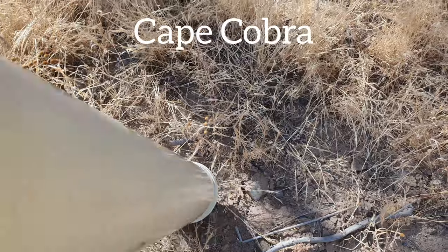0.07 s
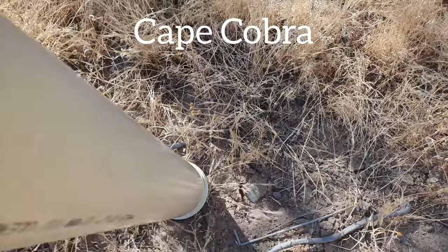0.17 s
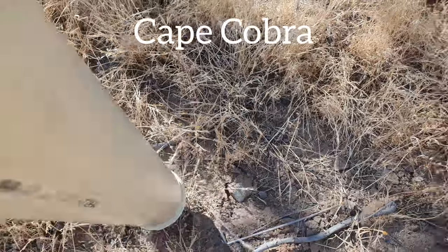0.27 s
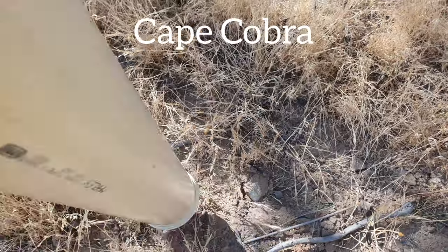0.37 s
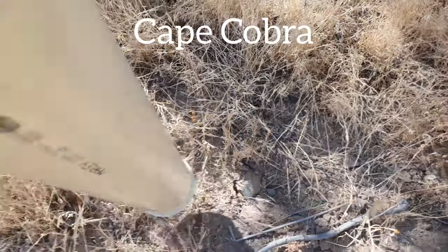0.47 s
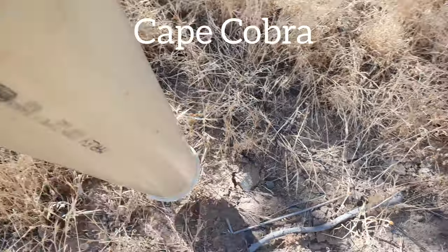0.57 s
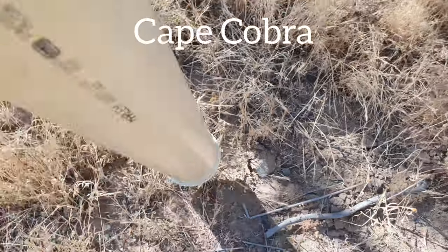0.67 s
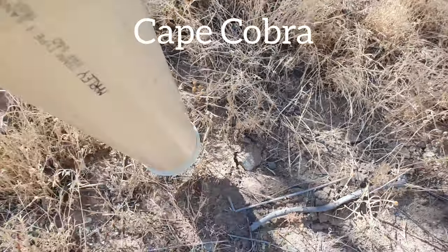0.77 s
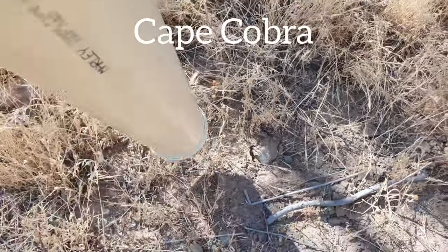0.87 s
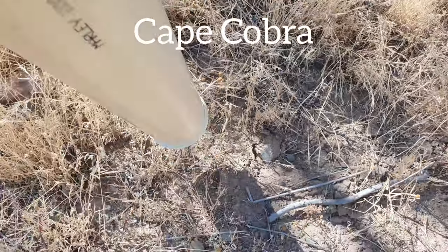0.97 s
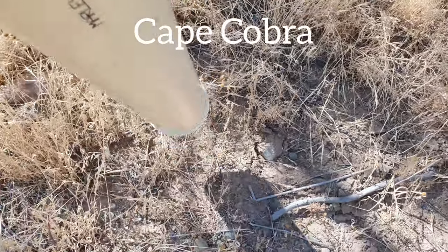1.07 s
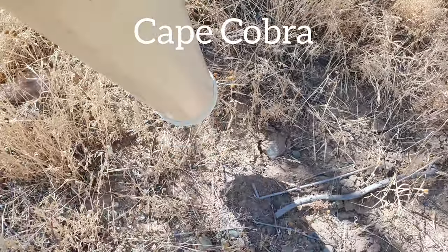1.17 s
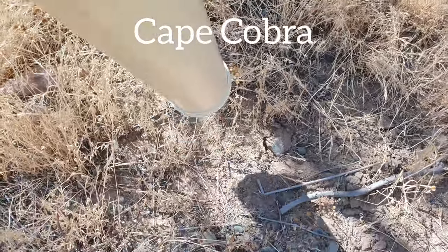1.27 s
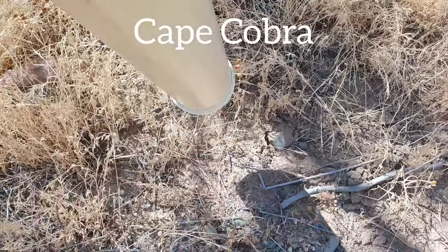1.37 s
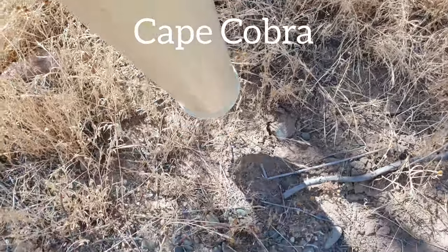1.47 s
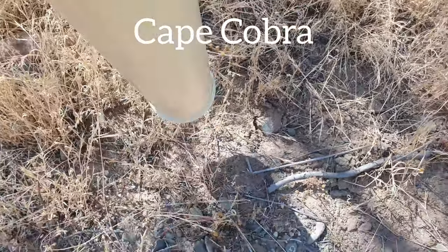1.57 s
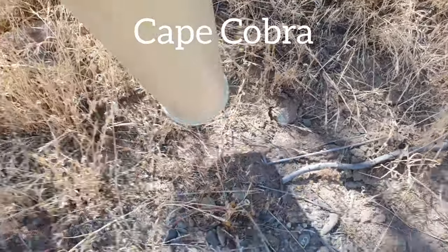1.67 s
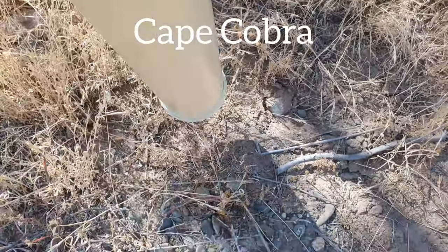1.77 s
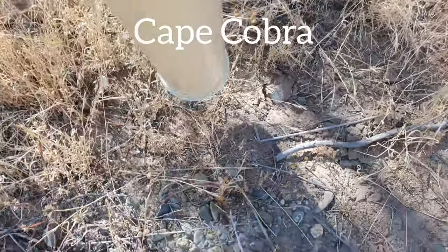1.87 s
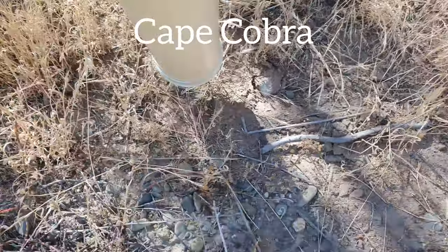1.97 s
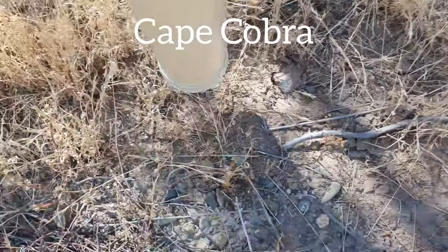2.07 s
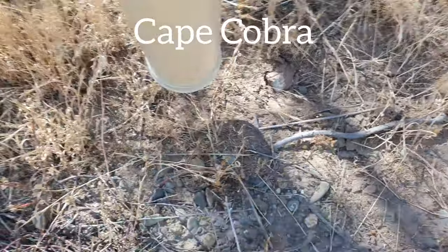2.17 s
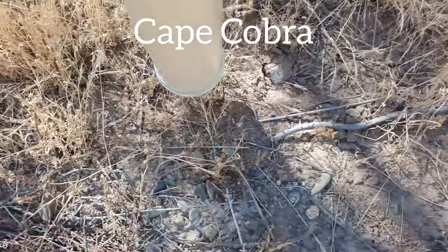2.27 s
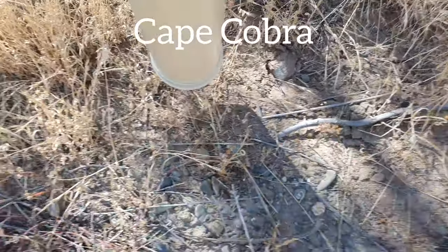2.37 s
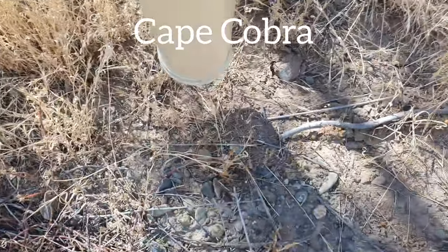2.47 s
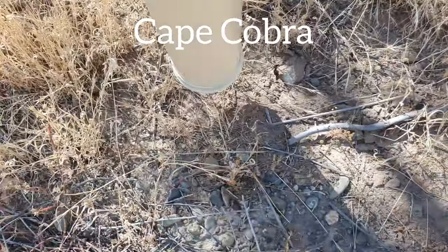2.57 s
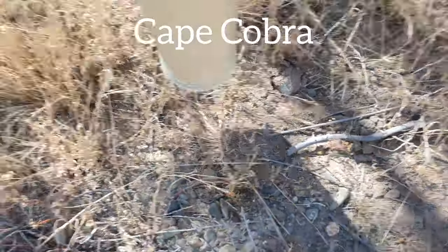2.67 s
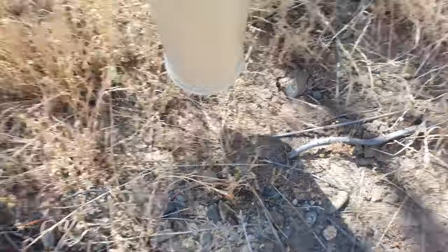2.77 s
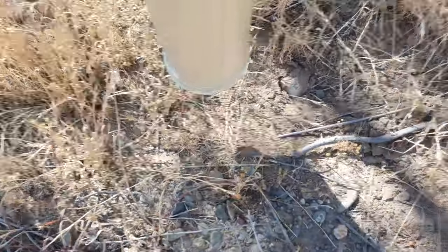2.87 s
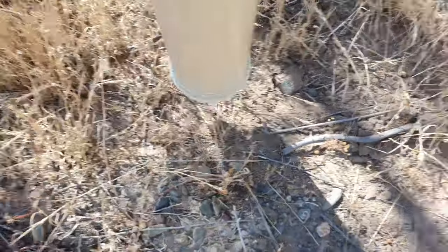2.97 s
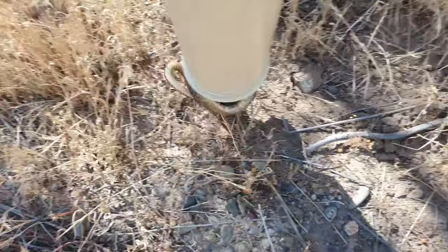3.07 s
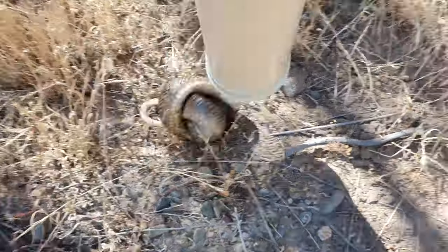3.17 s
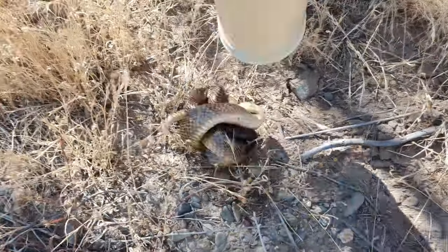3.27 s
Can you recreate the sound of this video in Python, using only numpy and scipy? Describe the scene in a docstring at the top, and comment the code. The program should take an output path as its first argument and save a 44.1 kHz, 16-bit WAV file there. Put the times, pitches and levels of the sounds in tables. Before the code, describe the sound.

Snake sliding in a shaken plastic pipe, rhythmic scaly scrapes, wind thumps, and a soft landing

```python
"""Low wind rumble, a faint rustle of dry grass and a distant cicada run throughout, made from noise and clicks.
Over them a snake slides to and fro in a plastic pipe shaken over the grass: each slide is a smooth scrape of
scales, made of grainy noise, and the heavier ones also ring the pipe through resonances. Stalks snap as short cracks
and wind thumps the two microphones separately. Near the end the snake drops out: a soft low bump and a ringing pipe."""
import sys
import numpy as np
from scipy import signal
from scipy.fft import rfft, irfft
from scipy.io import wavfile
from scipy.ndimage import uniform_filter1d, map_coordinates

SR = 44100
rng = np.random.default_rng(int(sys.argv[2]) if len(sys.argv) > 2 else 0)


def store_pcm(level_fs):
    """Save levels as 16-bit WAV."""
    pcm = np.round(np.clip(level_fs, -1, 1) * 32767).astype(np.int16)
    wavfile.write(sys.argv[1], SR, np.atleast_2d(pcm).T)


N = 147735  # length in samples

# Wind thumps at one microphone: centre_s, level_db, pitch_hz, length_ms (before BUFFET_SPREAD), side (0 left, 1 right)
BUFFETS = [(0.172, -15.5, 93.4, 13, 0), (0.171, -20, 101, 14.4, 1), (0.222, -19.5, 116, 7.8, 0),
           (0.338, -22.5, 83, 16, 1), (0.361, -8, 109, 2.86, 0), (0.414, -5, 83, 7.7, 0),
           (0.451, -18, 82, 28, 0),(0.486, -8.5, 130, 3.35, 0), (0.537, -18.5, 66, 74, 0),
           (0.572, -11.5, 73.4, 7.9, 0), (0.632, -18, 66.5, 31, 0), (0.698, -14.5, 90.3, 16, 0),
           (1.099, -18.5, 60, 12.5, 0), (1.209, -19.5, 87, 30, 0), (1.246, -16.5, 86, 5.6, 0),
           (1.272, -14.5, 84, 15.5, 0), (1.428, -21, 110.8, 18, 0), (1.5, -19, 69, 22, 0),
           (2.102, -11, 97, 5.5, 1), (2.267, -20.5, 93.5, 15, 1), (2.298, -16.5, 68.6, 21, 1),
           (2.317, -17, 77.4, 22, 0), (2.323, -18.5, 68, 32, 1), (2.359, -16.5, 73.6, 12, 0),
           (2.533, -15, 74.3, 27.6, 1), (2.583, -14.5, 88.7, 16.6, 1), (2.618, -18, 69, 20, 1),
           (2.741, -19.5, 73.5, 23, 1), (2.814, -20, 72, 12.5, 1)]
# Strength of the wind rumble: time_s, level_db, left_minus_right_db
GUST = [(0, -43.5, -9), (.2, -36, 5.5), (.6, -29, 9), (.95, -36, -2.5), (1.3, -33.5, 8.5),
        (1.55, -36.5, 11), (1.75, -46, -1), (1.86, -40, -7), (2.05, -41.5, -4.5), (2.4, -35.5, 3),
        (2.65, -34.5, -2.5), (2.85, -38.5, 2.5), (3.07, -38, 2), (3.2, -50, 1), (3.35, -42, 22)]
# Tone of the wind rumble: frequency_hz, relative_level_db (per Hz)
RUMBLE_TONE = [(22, -12), (40, 8.5), (60, 10), (100, 3.5), (200, -8.5), (400, -33.5), (900, -48.5)]
# Strength of the grass rustle: time_s, level_db
RUSTLE = [(0, -50), (.25, -46.5), (.33, -56.5), (.5, -51.5), (.68, -56), (.9, -57), (1.18, -57),
          (1.32, -59), (1.48, -55), (1.75, -57), (2.13, -54), (2.43, -51.5), (2.66, -48.5), (2.9, -54),
          (3.15, -57.5), (3.35, -59.5)]
# Tone of the grass rustle: frequency_hz, relative_level_db (per Hz)
RUSTLE_TONE = [(200, -2), (700, -1), (1100, -7), (4200, -5), (5600, -13.5), (8500, -21.5), (13400, -16.5),
               (15800, -16)]
# Strength of the nearer cicada: time_s, level_db
CICADA = [(0, -66), (2.3, -63), (2.7, -59), (2.95, -54), (3.18, -59), (3.35, -61)]
# Speed of its clicks: time_s, rate_hz
CLICK_RATE = [(0, 379), (.8, 388), (1.5, 397), (1.95, 400), (2.15, 387), (2.45, 375), (2.85, 364.7),
              (3.35, 363.5)]
# Resonance of its body: frequency_hz, relative_level_db
CICADA_BODY = [(6100, -16), (6550, -5), (6930, 0), (7400, -9), (8100, -15), (9000, -26)]
# Tone of the farther cicadas, blurred into hiss: frequency_hz, relative_level_db
CHORUS = [(6100, -20), (6700, 0), (7600, -8), (8200, -2), (9100, -20)]
# Slides of the body along the pipe wall: centre_s, length_s, hiss_db, ring_db
SLIDES = [(0.095, 0.058, -57, -55), (0.198, 0.1, -36, -36), (0.409, 0.064, -39, -48),
          (0.487, 0.055, -56.5, -52), (0.567, 0.073, -37, -44), (0.63, 0.085, -58, -60),
          (0.724, 0.069, -39.5, -49.5), (0.855, 0.069, -43.5, -52.5), (.994, 0.071, -42.5, -57),
          (1.128, 0.06, -46.5, -56), (1.244, 0.046, -49, -63), (1.38, 0.062, -42.5, -53),
          (1.467, 0.061, -50.5, -56), (1.536, 0.078, -39.5, -48.5), (1.666, 0.072, -44, -56.5),
          (1.814, 0.076, -43.5, -53.5), (1.903, 0.056, -48, -58.5), (1.986, 0.088, -38, -41),
          (2.13, 0.067, -45, -53.5), (2.193, 0.047, -53.5, -60), (2.279, 0.08, -40.5, -46),
          (2.437, 0.087, -41.5, -50), (2.619, 0.11, -39, -44), (2.798, 0.083, -45, -54),
          (3.006, 0.061, -41.5, -43.5), (3.06, 0.05, -41, -36), (3.167, 0.084, -49, -56),
          (3.262, 0.057, -53, -60.5)]
# Tone of the scraping scales: frequency_hz, relative_level_db (per Hz)
HISS_TONE = [(290, -35), (500, -9.5), (853, -16.5), (1500, -18.5), (1660, -13), (3780, -2), (6540, -8),
             (7670, -16), (15800, -10.5)]
# Lower ringing modes of the pipe wall: pitch_hz, width_hz, relative_level_db
WALL_LOWER = [(217, 92, 0), (726, 155, -3), (1180, 230, -3.5)]
# Upper ringing modes of the pipe wall: pitch_hz, width_hz, relative_level_db
WALL_UPPER = [(1556, 100, -3), (1955, 345, 2)]
# Air in the pipe, levels over the lower wall ring: time_s, air_pitch_hz, air_level_db, upper_wall_level_db
COLUMN = [(.2, 448, -5, -2.5), (.57, 483, -2, 0), (1.2, 378, -11.5, 1.5), (1.67, 277, 0, 0.5),
          (1.98, 375, 2, -4), (2.28, 447, 2, -16), (2.6, 440, -10, -5.5), (3.04, 319, -3.5, -3.5),
          (3.2, 360, -6.5, -6)]
# Bearing of the pipe: time_s, left_lead_samples, hiss_left_minus_right_db
BEARING = [(0, 23, 6.5), (.5, 13.4, 6.5), (1.9, 12.9, 1.5), (2.5, 5.5, 1.5), (3.35, 3.3, -1.5)]
# Dry stalks snapping: start_s, level_db, pitch_hz
SNAPS = [(0.1565, -21.5, 2040), (0.437, -28, 1780), (2.713, -38.5, 5470), (3.015, -29.5, 1560),
         (3.0507, -21, 1990), (3.0655, -26, 6500), (3.072, -30, 4150), (3.175, -37, 4040),
         (3.2595, -43, 10600), (3.3357, -37.5, 6800)]
# Ring of the emptied pipe: pitch_hz, relative_level_db, time_to_fall_60_db_s
EMPTY = [(287, -1.5, 0.18), (360, -2, 0.3), (813, -5, 0.16), (1065, -6, 0.12)]

BUFFET_SPREAD, BUFFET_CUSP, BUFFET_SCATTER = 0.69, 1.22, 1  # length factor, peak shape, phase spread in radians
RUMBLE_FLUTTER_DB, RUSTLE_FLUTTER_DB = 5, 2.5
TICK_DB = 1.6  # scatter of grain sizes in the grass
THROB_HZ, THROB_DEPTH, CLICK_JITTER = 60, .35, .002  # depth and jitter are fractions
FIRST_MULTIPLE, MULTIPLES = 16, 9  # lowest multiple of the click rate that is heard, and how many
CHORUS_DB = -61.5
SLIDE_SQUARE, RING_SQUARE = 3.55, 2.4  # how flat the tops of the hiss and ring are
SLIDE_ROUGH_DB, RING_ROUGH_DB = 1.15, 3  # graininess of the hiss, flutter of the ring
COLUMN_WIDTH_HZ = 95
TREBLE_PAN, RING_PAN = 1.82, 0.18  # share of the hiss pan used by treble and ring
ALIKE, ALIKE_HZ = 0.52, 2730  # likeness of the microphones, fading above this frequency
SNAP_S = 0.001  # fading time of a crack
THUD_S, THUD_HZ, THUD_DB, THUD_LENGTH_S = 3.05, 103, -30.5, 0.023
EMPTY_S, EMPTY_DB = 3.056, -36.5
TOP_HZ = 15850


def undb(db):
    """Turn decibels into a gain."""
    return 10 ** (np.asarray(db) / 20)


def unit(x):
    """Scale to an average (rms) strength of 1."""
    return x / np.sqrt(np.mean(x ** 2))


def seconds():
    """The time of every sample."""
    return np.arange(N) / SR


def curve(table, col):
    """Join one table column over time with straight lines."""
    rows = np.array(table, float)
    return np.interp(seconds(), rows[:, 0], rows[:, col])


def freqs():
    """The frequencies used for filtering; the tiny offset avoids zero."""
    return np.arange(N // 2 + 1) * SR / N + 1e-9


def shape(x, gain):
    """Filter by a gain for each frequency."""
    return irfft(rfft(x) * gain, N)


def colour(points):
    """Draw a gain curve through (Hz, dB) points, with pitch spaced by ratio."""
    p = np.array(points, float)
    return undb(np.interp(np.log(freqs()), np.log(p[:, 0]), p[:, 1]))


def rings(modes):
    """Add resonances side by side, with alternating signs."""
    f = freqs()
    response = 0
    for k, (hz, width, db) in enumerate(modes):
        response = response + (-1) ** k * undb(db) / (1 + 1j * (f - hz * hz / f) / width)
    return response


def walk(rate):
    """Wander randomly at about this rate per second, with spread 1."""
    k = int(SR / rate)
    smooth = uniform_filter1d(rng.standard_normal(N), k)
    return unit(uniform_filter1d(smooth, k))


def grains(scatter_db):
    """Two noises whose grains share sizes with a long tail, so that some stand out as ticks."""
    size_steps = np.minimum(rng.exponential(size=N // 32 + 1), 5)
    size = undb(scatter_db * np.repeat(size_steps, 32)[:N])  # each grain lasts 32 samples
    return rng.standard_normal((2, N)) * size


def two_mics(x, gain, pan_db):
    """The right microphone hears the sound later; the two grow less alike towards the treble."""
    alike = ALIKE / np.sqrt(1 + (freqs() / ALIKE_HZ) ** 2)
    late = map_coordinates(x[0], [np.arange(N) - curve(BEARING, col=1)], mode="mirror")
    left = shape(x[0], gain)
    right = shape(late, gain * alike) + shape(x[1], gain * np.sqrt(1 - alike ** 2))
    return unit(np.array([left, right])) * undb(np.array([pan_db, -pan_db]) / 2)


def wind():
    """Single eddies thump one microphone at a time over a fluttering rumble."""
    thumps, t = np.zeros((2, N)), seconds()
    turn = BUFFET_SCATTER * rng.standard_normal((len(BUFFETS), 1))
    for (at, db, hz, ms, side), phase in zip(BUFFETS, turn):
        near = slice(max(int((at - .08) * SR), 0), int((at + .08) * SR))
        u = t[near] - at
        swell = np.exp(-np.abs(u / (BUFFET_SPREAD * ms / 1000)) ** BUFFET_CUSP)
        thumps[int(side > .5), near] -= undb(db) * swell * np.cos(2 * np.pi * hz * u + phase)
    rumble = np.zeros((2, N))
    for side in range(2):
        flutter = undb(RUMBLE_FLUTTER_DB * walk(27.0))
        rumble[side] = unit(shape(rng.standard_normal(N) * flutter, colour(RUMBLE_TONE)))
    pan = curve(GUST, col=2)
    return thumps + rumble * undb(curve(GUST, col=1) + np.array([pan, -pan]) / 2)


def rustle():
    """Dry grass ticks faintly: noise grains of uneven size, filtered and fluttering."""
    sides = []
    for grain in grains(TICK_DB):
        level_db = curve(RUSTLE, col=1) + RUSTLE_FLUTTER_DB * walk(7.2)
        sides.append(unit(shape(grain, colour(RUSTLE_TONE))) * undb(level_db))
    return np.array(sides)


def cicada():
    """Regular clicks ring the body near 7 kHz and throb at the muscle rate, over a blurred chorus."""
    throb = 1 + THROB_DEPTH * np.sin(2 * np.pi * THROB_HZ * seconds() + .5 * walk(1.8))
    rate = curve(CLICK_RATE, col=1) * (1 + CLICK_JITTER * walk(58.2))
    phase = 2 * np.pi * np.cumsum(rate) / SR
    clicks = np.zeros(N)
    # Build the audible part of the clicks from multiples of their rate.
    for k in range(MULTIPLES):
        drift = np.cumsum(walk(30)) * 70 / SR
        clicks += undb(2.7 * walk(8)) * np.cos((FIRST_MULTIPLE + k) * phase + drift)
    near = unit(shape(clicks * throb, colour(CICADA_BODY))) * undb(curve(CICADA, col=1))
    chorus_gain = colour([(4000, -70), *CHORUS, (12000, -70)])
    far = unit(shape(rng.standard_normal((2, N)), chorus_gain))
    return near + far * undb(CHORUS_DB + 1.2 * walk(4.6))


def slides():
    """Scales scrape the wall: a bright hiss and a grainier ring of wall and air, following sliding speed."""
    t = seconds()
    hiss_power, ring_power, column = np.zeros((3, N))
    puff = rng.standard_normal(N) * undb(1.5 * walk(60))
    for at, length, hiss_db, ring_db in SLIDES:
        distance = np.abs(2 * (t - at) / length)
        speed = np.exp(-np.log(4) * distance ** SLIDE_SQUARE)
        press = np.exp(-np.log(4) * distance ** RING_SQUARE)
        hiss_power += speed * undb(2 * hiss_db)
        ring_power += press * undb(2 * ring_db)
        # The air column has one pitch for each slide.
        hz, column_db = (curve(COLUMN, col=c)[int(at * SR)] for c in (1, 2))
        peak = signal.iirpeak(hz, hz / COLUMN_WIDTH_HZ, fs=SR)
        drive = puff * np.sqrt(press * SR / (np.pi * COLUMN_WIDTH_HZ))
        column += signal.lfilter(*peak, drive) * undb(ring_db + column_db)
    pan = curve(BEARING, col=2)
    # Split the hiss at 8500 Hz so that the treble can be panned wider.
    low = 1 / (1 + (freqs() / 8500) ** 8)
    hiss_gain = colour(HISS_TONE)
    share = np.sqrt(np.mean(hiss_gain ** 2 * low ** 2) / np.mean(hiss_gain ** 2))
    grain = grains(SLIDE_ROUGH_DB)
    scrape = share * two_mics(grain, hiss_gain * low, pan)
    scrape += np.sqrt(1 - share ** 2) * two_mics(grain, hiss_gain * (1 - low), TREBLE_PAN * pan)
    knock = rng.standard_normal((2, N)) * undb(RING_ROUGH_DB * walk(98))
    wall = two_mics(knock, rings(WALL_LOWER), RING_PAN * pan)
    wall += undb(curve(COLUMN, col=3)) * two_mics(knock, rings(WALL_UPPER), RING_PAN * pan)
    return column + np.sqrt(hiss_power) * scrape + np.sqrt(ring_power) * wall


def snaps():
    """Dry stalks crack: a tone mixed with noise dies away fast, noisier at higher pitch."""
    out, t = np.zeros((2, N)), np.arange(400) / SR
    chance = rng.standard_normal((len(SNAPS), 400))
    for (at, db, hz), noise in zip(SNAPS, chance):
        i = int(at * SR)
        crack = (np.sin(2 * np.pi * hz * t) + hz / 8000 * noise) * np.exp(-t / SNAP_S) * undb(db)
        out[:, i:i + 400] += crack[:N - i]
    return out


def thud():
    """The body lands on the ground: a low tone swells and fades in a soft bump."""
    u = seconds() - THUD_S
    return undb(THUD_DB) * np.exp(-(u / THUD_LENGTH_S) ** 2) * np.cos(2 * np.pi * THUD_HZ * u)


def empty_pipe():
    """The body leaves the mouth and the pipe rings out as fading tones."""
    u = np.maximum(seconds() - EMPTY_S, 0)
    ring = np.zeros(N)
    for hz, db, t60 in EMPTY:
        ring += undb(db - 60 * u / t60) * np.sin(2 * np.pi * hz * u)
    return ring * undb(EMPTY_DB + 1.3 * walk(28))


def scene():
    """Add all the sources at the two microphones."""
    return wind() + rustle() + cicada() + slides() + snaps() + thud() + empty_pipe()


def record(dry):
    """Roll off the deepest rumble and cut the top steeply."""
    dry = signal.sosfilt(signal.butter(2, 30, "high", fs=SR, output="sos"), dry)
    return signal.sosfilt(signal.ellip(10, .2, 70, TOP_HZ, fs=SR, output="sos"), dry)


dry = scene()
out = record(dry)
store_pcm(out)
```